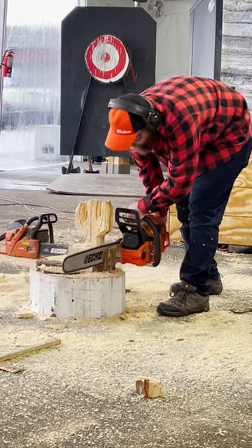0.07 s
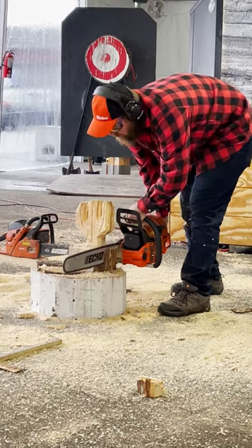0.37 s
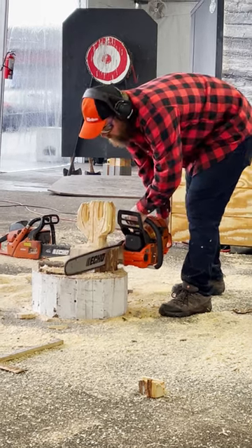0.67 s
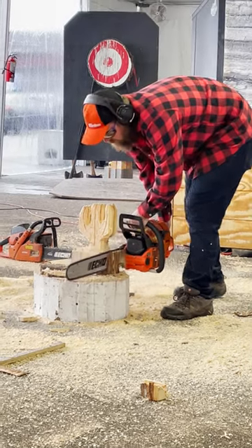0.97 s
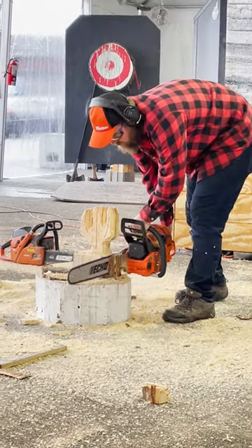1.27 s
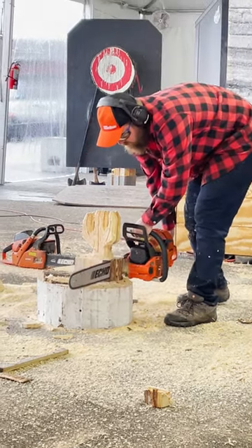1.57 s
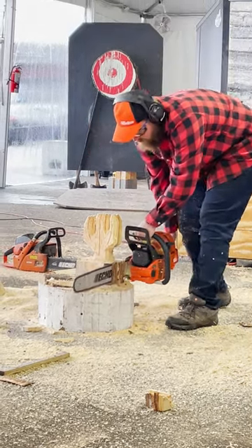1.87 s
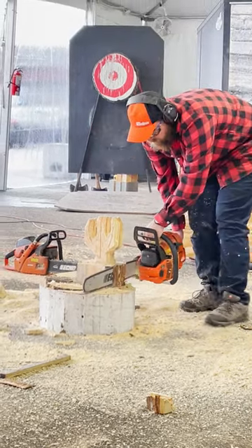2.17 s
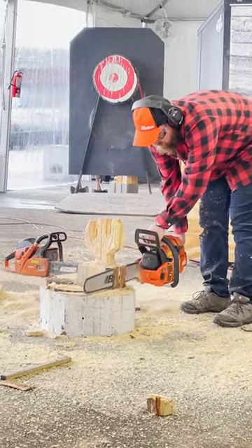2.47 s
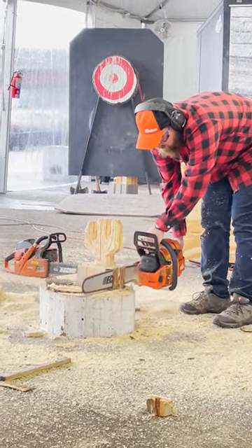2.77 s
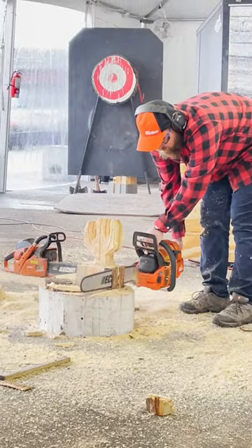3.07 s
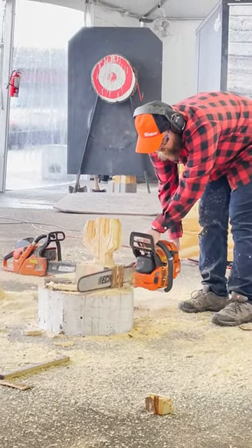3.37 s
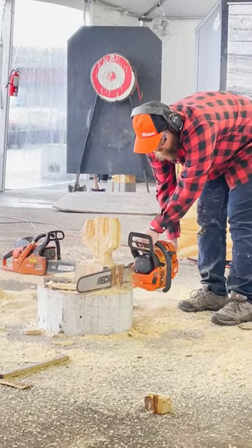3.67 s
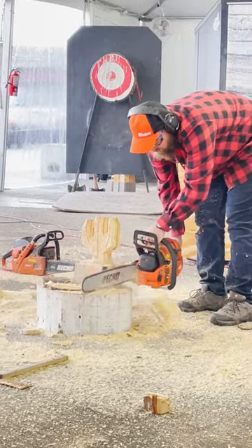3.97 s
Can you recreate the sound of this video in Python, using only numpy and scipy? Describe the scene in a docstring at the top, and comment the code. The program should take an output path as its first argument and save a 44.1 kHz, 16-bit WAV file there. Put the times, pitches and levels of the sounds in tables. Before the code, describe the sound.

A chainsaw carves wood at full throttle, sagging in the cut and revving back up.

```python
"""A two-stroke chainsaw carves a log at full throttle in an open tent, about two metres away.
It starts high and bright: exhaust pulses drone and bark, the casing rasps, the chain hisses, a thin whine
rides the crankshaft, and bark and rasp echo off the tent. The chain bites; the engine sputters and sags,
lowest near 1.3 s. By 2 s it has recovered with a metallic scream, and it holds near top speed
until the throttle eases at the very end."""
import sys
import numpy as np
from scipy import signal
from scipy.fft import rfft, irfft, next_fast_len
from scipy.io import wavfile
from scipy.ndimage import uniform_filter1d, map_coordinates

SR = 44100
rng = np.random.default_rng(int(sys.argv[2]) if len(sys.argv) > 2 else 0)


def unload_audio(sound):
    """Save the sound as a 16-bit wav file, at the path given as the first command line argument."""
    columns = np.transpose(np.atleast_2d(sound))
    # keep every value between -1 and 1, then stretch to whole-number steps
    steps = np.round(np.clip(columns, -1, 1) * 32767)
    wavfile.write(sys.argv[1], SR, steps.astype(np.int16))


N = 176400
T = np.arange(N) / SR

# engine speed (time [s], firing rate [Hz])
FIRING_RATE = [(0, 190.5), (.12, 195.3), (.2, 194.3), (.37, 181), (.56, 178.5), (.77, 168), (1.02, 160),
               (1.18, 152), (1.32, 149.7), (1.49, 152), (1.62, 162.5), (1.8, 186), (1.92, 194.5),
               (2.06, 196.7), (2.3, 192), (2.48, 189.8), (2.71, 194.3), (3.02, 190.3), (3.32, 188.1),
               (3.55, 191.4), (3.77, 192), (3.86, 195), (4, 173)]

# fader rides, ahead of the trims (time [s], level [dB])
DRONE_RIDE = [(0.0, -22.5), (0.13, -27.5), (0.61, -30.5), (0.8, -35), (0.95, -28.5), (1.12, -29),
              (1.36, -34.5), (1.57, -27.5), (1.65, -28.5), (1.68, -36), (1.75, -26.5), (1.85, -26),
              (2.08, -34), (2.25, -29.5), (3.75, -27.5), (4.0, -40)]  # the exhaust's firing tone
OCTAVE_RIDE = [(0, -26.5), (.05, -24.5), (.22, -40), (.28, -25), (.41, -46), (.61, -32.5), (1.1, -40),
               (1.18, -32), (1.48, -33.5), (1.57, -37.5), (1.87, -30.5), (2.13, -30), (2.25, -43),
               (2.36, -29), (2.62, -31.5), (2.79, -43), (2.93, -28), (3.33, -33), (3.55, -28),
               (3.81, -30.5), (3.87, -40), (4, -36)]  # its octave
BARK_RIDE = [(0, -29), (.1, -26), (.25, -32.5), (.52, -38.5), (.72, -32.5), (.9, -30.5), (1.2, -31),
             (1.35, -32.5), (1.45, -31.5), (1.7, -31.5), (2.15, -34), (2.38, -37), (2.57, -32),
             (2.66, -26.5), (2.85, -29), (3.2, -38), (3.5, -33.5), (3.62, -26.5), (3.95, -34)]
RASP_RIDE = [(0, -28.5), (.14, -28), (.3, -30.5), (.6, -30), (.85, -33), (1.8, -31.5), (1.96, -28),
             (2.8, -28), (3.05, -30), (3.92, -30)]  # strongest when the engine runs free
WHINE_RIDE = [(0, -34.5), (.35, -35), (.55, -31), (.75, -46), (1.55, -36), (1.75, -33), (2.1, -33),
              (2.72, -29.5), (3.1, -36.5), (3.35, -30.5), (3.72, -27), (4, -38)]
GRIT_RIDE = [(0, -33), (.17, -37), (.4, -50), (1.83, -41.5), (1.97, -34.5), (2.45, -32.5), (2.85, -35),
             (3.02, -41)]  # surges at high speed
# the chain's two fader rides (time [s], cut level [dB], hiss level [dB])
CHAIN_RIDE = [(0, -31.5, -29), (.55, -32, -30.5), (.85, -33, -32), (1.65, -34, -32), (1.85, -31, -30),
              (2.45, -32.5, -29.5), (3.1, -32, -30.5), (3.72, -31, -29.5), (4, -33.5, -33.5)]

# exhaust overtones that flare (time [s], shaft order, boost [dB], half length [s])
BARK_FLARES = [(.08, 3, 6.5, 0.096), (1.145, 6, 9.5, 0.02), (1.46, 6, 3.5, 0.045), (1.63, 4, 5, 0.031),
               (1.715, 4, 0.5, 0.027), (2.77, 4, 1, 0.092)]
# tones ringing in bar and casing (shaft order, level [dB], half length [s])
RING_TONES = [(7, -29, 0.15), (12, -27.5, 0.12), (15, -32.5, 0.091), (22, -32.5, 0.18)]

# tone colours (frequency [Hz], relative level [dB])
BARK_EQ = [(350, 11), (460, -2), (580, -1.5), (660, 4.5), (780, -2), (930, 2.5), (1040, -1.5), (1170, -1),
           (1330, -17.5), (1800, -14), (3000, -29)]  # muffler
RASP_EQ = [(1000, -16.5), (1400, -9), (1520, -4.5), (1700, -9), (1900, -0.5), (2010, -6.5), (2130, 0.5),
           (2320, -0.5), (2650, -6), (3020, -2), (3250, -15.5), (3480, -10.5), (3750, -7), (5200, -4.5),
           (8000, -26)]  # rattling metal
CUT_EQ = [(200, -19), (320, -13), (480, -6), (680, -2.5), (1100, -7), (1600, -3.5), (2250, -2), (3100, 0),
          (3900, -8.5), (4700, -9), (6000, -21.5), (9000, -41)]  # teeth tearing wood
HISS_EQ = [(1500, -33), (3500, -2), (7000, -1.5), (8500, 0.5), (10900, 3), (11900, -4), (12700, -13),
           (14400, -34)]  # links on the bar
BITE_EQ = [(1800, -40), (3400, -15), (5500, -3), (9000, -40)]  # teeth deep in the wood
GRIT_EQ = [(1650, -48), (2080, 2.5), (2380, -0.5), (3000, -50)]  # a gritty band near 2.2 kHz, probably muffler or casing resonating
RUMBLE_EQ = [(28, -24), (60, -1.5), (110, 3), (170, 5), (250, -17.5)]  # outdoor air

# the tent's reverb (frequency [Hz], time to fall 60 dB [s])
TENT_DECAY = [(200, 0.49), (2000, 0.67), (10000, 0.12)]
# how alike the noise is left and right (frequency [Hz], likeness [0 to 1])
STEREO_LIKENESS = [(100, 1), (600, 0.78), (1400, 0.62), (2500, 1), (4100, 0.55), (5900, 1), (6700, 0.61),
                   (9200, 1), (10200, 0.85), (11500, 0.79), (12600, 1)]
# how far the left microphone port leads the right (frequency [Hz], phase [rad])
LEFT_LEAD = [(100, 0), (1600, 0), (2700, .65), (4000, .75), (4550, 1.6), (4880, 3.14), (5200, 5),
             (5700, 6.2), (6200, 6.35), (7200, 7.8), (9200, 9.42), (10800, 10.9), (12300, 12.55)]

FREE_HZ, BOGGED_HZ = 195, 150  # firing rates at no load and full load
HUNTING = 0.001563  # share by which the speed wanders
JITTER_S, LOAD_JITTER_TURNS = 1.8e-5, 0.0083  # firing scatter; the bark's extra at full load
ROUGH_FREE_DB, ROUGH_LOAD_DB = 1, -0.4  # scatter of pulse size; its change at full load
SPUTTER_AT_S, SPUTTER_WIDTH_S, SPUTTER_DB = 0.3, 0.16, 1.9
SPREAD_S = 0.001592  # scales how far the muffler spreads each pulse
RING_AT_S, WHINE_ORDER, TOP_HZ = 2.063, 18, 14400
DRONE_TRIM_DB, OCTAVE_TRIM_DB, BARK_TRIM_DB, RASP_TRIM_DB = 1.5, 0.4, 0.5, 2
CUT_TRIM_DB, HISS_TRIM_DB, WHINE_TRIM_DB = 2, 5, -2
BITE_DB, RUMBLE_DB = -46, -43
TENT_DB, TENT_SIDE_DB, DRONE_SIDE_DB = -6.5, -8, -23  # echo send; stereo width of echo and drone


def crankshaft():
    """Firing rate and turns made, with slight hunting and scatter from firing to firing."""
    speed = uniform_filter1d(curve(FIRING_RATE), size=2200, mode="nearest")
    speed *= 1 + HUNTING * wobble(22.05)
    return speed, np.cumsum(speed) / SR + JITTER_S * speed * wobble(180)


def drone(turns):
    """The exhaust's two lowest orders, nearly pure and central, sputtering as the chain first bites."""
    firing = amp(curve(DRONE_RIDE) + DRONE_TRIM_DB + 0.61 * wobble(30.4)) * np.cos(2 * np.pi * turns)
    octave = amp(curve(OCTAVE_RIDE) + OCTAVE_TRIM_DB + 1.84 * wobble(40)) * np.sin(4 * np.pi * turns)
    sputter = amp(SPUTTER_DB * swell(SPUTTER_AT_S, SPUTTER_WIDTH_S) * wobble(260))
    tone = np.sqrt(2) * (firing + octave) * sputter
    side = amp(DRONE_SIDE_DB) * tone.std() * unit(echo(tone))
    return np.array([tone + side, tone - side])


def bark(speed, turns):
    """Exhaust pulses through the muffler; load loosens their timing, and single overtones flare."""
    load = loading(speed)
    turns = turns + LOAD_JITTER_TURNS * load * wobble(90)
    train = pulses(turns, speed, BARK_EQ, drift_db=1.7 + 1.6 * load, drift_hz=22,
                   smear_rad=0.82, top_order=14, flares=BARK_FLARES)
    uneven = amp((ROUGH_FREE_DB + ROUGH_LOAD_DB * load) * wobble(150))
    return amp(curve(BARK_RIDE) + BARK_TRIM_DB) * unit(tent(train * uneven))


def rasp(speed, turns):
    """The bright rattle of muffler and casing, struck at every firing."""
    train = pulses(turns, speed, RASP_EQ, drift_db=2.7, drift_hz=21, smear_rad=1.0, top_order=37)
    uneven = amp(2.1 * wobble(170))
    return amp(curve(RASP_RIDE) + RASP_TRIM_DB) * unit(tent(train * uneven))


def pulses(turns, speed, eq, drift_db, drift_hz, smear_rad, top_order, flares=()):
    """One spread pulse a turn, harmonics 3 and up; each drifts as the saw moves among reflections."""
    train = np.zeros(N)
    for k in range(3, top_order + 1):
        lag = 2 * np.pi * k * speed * SPREAD_S * np.exp(-k / 10)
        phase = 2 * np.pi * k * turns - lag + smear_rad * wobble(drift_hz / 2)
        flare_db = sum(db * swell(at_s, width) for at_s, order, db, width in flares if round(order) == k)
        train += amp(along(eq, k * speed) + flare_db + drift_db * wobble(drift_hz)) * np.cos(phase)
    return unit(train)


def loading(speed):
    """How hard the cut holds the engine back, 0 to 1."""
    return np.clip((FREE_HZ - speed) / (FREE_HZ - BOGGED_HZ), 0, 1)


def chain(speed, turns):
    """Teeth tear wood and links hiss along the bar, surging at each firing, biting harder under load."""
    surge = np.cos(2 * np.pi * turns)
    cut_db = curve(CHAIN_RIDE) + CUT_TRIM_DB + 0.31 * surge + 0.5 * wobble(70)
    hiss_db = curve(CHAIN_RIDE, column=2) + HISS_TRIM_DB + 0.21 * surge + 0.54 * wobble(70)
    bite = amp(BITE_DB + surge) * loading(speed) * rush(BITE_EQ, patchy_db=-1)
    grit = amp(curve(GRIT_RIDE) + surge + wobble(77)) * rush(GRIT_EQ, patchy_db=-1)
    cut = amp(cut_db) * rush(CUT_EQ, patchy_db=1)
    hiss = amp(hiss_db) * rush(HISS_EQ, patchy_db=1)
    return bite + grit + cut + hiss


def ring(turns):
    """A few shaft orders set bar and casing ringing: one metallic scream, cued to the engine's peak."""
    scream = np.zeros(N)
    for order, db, width_s in RING_TONES:
        envelope = amp(db + 2.4 * wobble(24.7)) * swell(RING_AT_S, width_s)
        scream += envelope * np.sin(2 * np.pi * (round(order) * turns + rng.random()))
    return np.sqrt(2) * scream


def whine(turns):
    """A thin tone on a high shaft order, probably the blades of the cooling fan."""
    tone = np.sqrt(2) * np.sin(2 * np.pi * WHINE_ORDER * turns)
    return amp(curve(WHINE_RIDE) + WHINE_TRIM_DB + 1.6 * wobble(25.1)) * tone


def tent(x):
    """A sound plus its echo off the tent walls, a little different left and right."""
    side = amp(TENT_SIDE_DB) * echo(x)
    return x + amp(TENT_DB) * (echo(x) + np.array([side, -side]))


def echo(x):
    """One diffuse reverb tail of the tent; the treble dies first."""
    hz, t, spectrum = signal.stft(rng.standard_normal(SR // 3), SR, nperseg=256)
    decay = amp(-60 * t / along(TENT_DECAY, hz)[:, None])
    tail = signal.istft(spectrum * decay, SR, nperseg=256)[1]
    return signal.fftconvolve(x, tail / np.linalg.norm(tail))[:N]


def air():
    """A bed of low outdoor rumble, in faint lumps that differ left and right."""
    lumps_db = 0.96 * wobble(9.4) + 0.55 * np.array([wobble(12), wobble(9.9)])
    return amp(RUMBLE_DB + lumps_db) * rush(RUMBLE_EQ, patchy_db=2.5)


def rush(eq, patchy_db):
    """Coloured stereo noise of rms 1 with patches of random gain, partly alike left and right."""
    def mid_side_gains(hz):
        width = np.arccos(np.clip(along(STEREO_LIKENESS, hz), -1, .995)) / 2
        return amp(along(eq, hz)) * [np.cos(width), np.sin(width)]

    spectrum = signal.stft(rng.standard_normal((2, N)), nperseg=512)[2]
    patches = uniform_filter1d(rng.standard_normal(spectrum.shape[1:]), size=7, axis=0)  # across pitch
    patches = uniform_filter1d(patches, size=9, axis=1)  # across time
    noise = signal.istft(spectrum * amp(patchy_db * unit(patches)), nperseg=512)[1][:, :N]
    mid, side = filtered(noise, mid_side_gains)
    return unit(np.array([mid + side, mid - side]))


def filtered(x, response):
    """x through a filter, given as complex gain against frequency."""
    size = next_fast_len(N + SR // 4)
    return irfft(rfft(x, size) * response(np.fft.rfftfreq(size, 1 / SR)), size)[..., :N]


def wobble(rate_hz):
    """A smooth random modulator, rate_hz knots a second."""
    coarse = T[::32]
    smooth = map_coordinates(rng.standard_normal(4096), [coarse * rate_hz], mode="wrap")
    return np.interp(T, coarse, smooth)


def swell(at_s, width_s):
    """A bell-shaped rise and fall."""
    return np.exp(-((T - at_s) / width_s) ** 2)


def curve(rows, column=1):
    """One column of a time table, per sample."""
    rows = np.asarray(rows)
    return np.interp(T, rows[:, 0], rows[:, column])


def along(points, hz):
    """A frequency table read on a log axis."""
    knots_hz, values = np.transpose(points)
    return np.interp(np.log(hz + 1), np.log(knots_hz + 1), values)


def amp(db):
    """Decibels to gain."""
    return 10 ** (np.asarray(db) / 20)


def unit(x):
    """Scaled to rms 1."""
    return x / np.sqrt(np.mean(x ** 2) + 1e-20)


def scene():
    """The saw, every layer locked to one crankshaft, over quiet outdoor air."""
    speed, turns = crankshaft()
    engine = drone(turns) + bark(speed, turns) + rasp(speed, turns) + ring(turns) + whine(turns)
    return engine + chain(speed, turns) + air()


def record(dry):
    """The treble reaches the two microphone ports out of step; everything above TOP_HZ is cut."""
    half_each_way = np.array([[0.5], [-0.5]])
    return filtered(dry, lambda hz: np.exp(1j * along(LEFT_LEAD, hz) * half_each_way) * (hz < TOP_HZ))


dry = scene()
out = record(dry)
unload_audio(out)
```